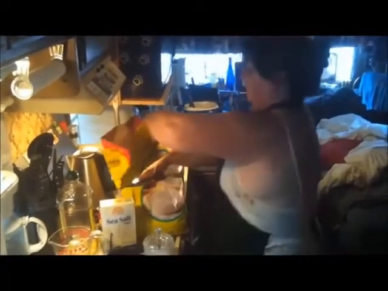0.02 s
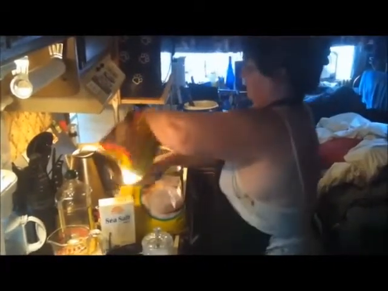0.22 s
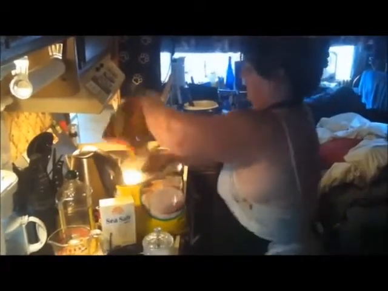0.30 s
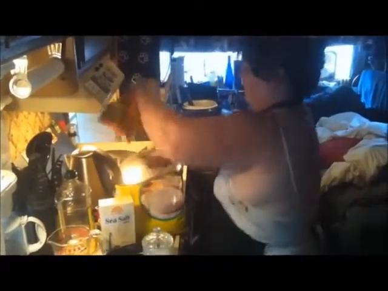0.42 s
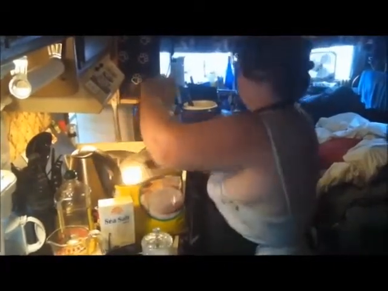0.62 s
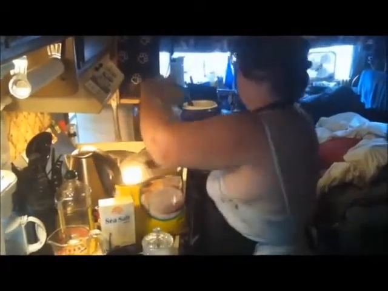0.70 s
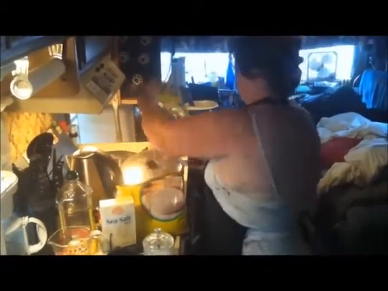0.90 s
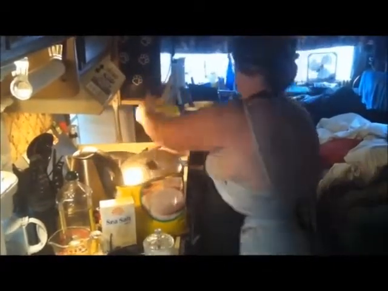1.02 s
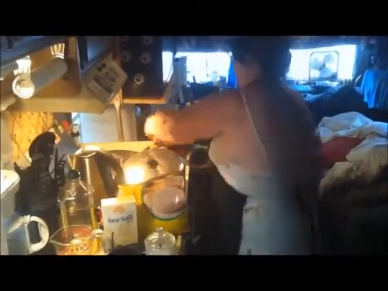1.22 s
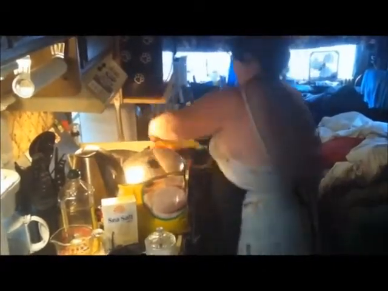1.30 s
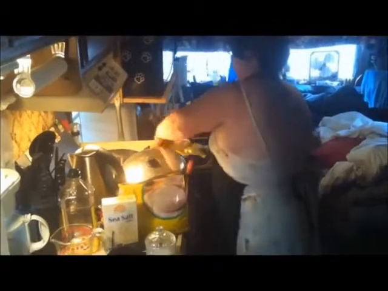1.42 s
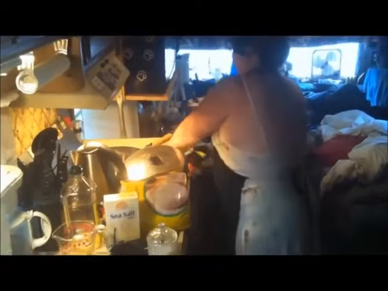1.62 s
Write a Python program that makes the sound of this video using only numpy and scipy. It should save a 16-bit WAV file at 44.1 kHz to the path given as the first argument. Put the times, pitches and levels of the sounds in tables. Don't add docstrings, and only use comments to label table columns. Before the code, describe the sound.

Stiff paper crackles softly, then a sharp clack with a short hollow cup ring and bright crease snap; a few fading crinkles, faint ticks over quiet hiss, then a light papery bump at the end. Cramped dry room, modest microphone.

```python
import sys
import numpy as np
from scipy import signal
from scipy.fft import rfft, irfft, next_fast_len
from scipy.io import wavfile
from scipy.ndimage import uniform_filter1d

SR = 44100
rng = np.random.default_rng(int(sys.argv[2]) if len(sys.argv) > 2 else 0)


def to_wav(sig):
    pcm = np.clip(np.atleast_2d(sig), -1, 1) * 32767
    pcm = np.round(pcm).astype(np.int16)
    wavfile.write(sys.argv[1], SR, pcm.T)


def convert_level_to_amplitude(level_db):
    exponent = np.asarray(level_db, float) / 20
    return 10 ** exponent


N = 72765

# (time [s], rustle level [dB])
HANDLING = [(0, -48.5), (.045, -50), (.12, -49), (.2, -50.5), (.243, -45.5), (.3, -44.5), (.36, -49.5),
            (.44, -57), (.49, -62.5), (.59, -62.5), (.66, -59), (.72, -67.5), (1.03, -64.5), (1.07, -61.5),
            (1.18, -71), (1.33, -63.5), (1.39, -62), (1.46, -57), (1.52, -60), (1.65, -55.5)]
# (time [s], peak [dB], brightness [dB], hold [s], t60 [s])
CRINKLES = [(0.064, -39, 0, 0.004, 0.058), (0.072, -35, 0.5, 0.0064, 0.15), (0.0748, -38, 7.5, 0.0035, .03),
            (0.134, -38, 2.5, 0.0075, 0.044), (0.146, -34, -1.5, 0.04, 0.27),
            (0.227, -33.5, 0, 0.0091, 0.067), (0.2466, -22.5, 0.5, 0.004, 0.12),
            (0.2515, -21.5, 6.5, 0.005, 0.07), (0.265, -22, 0, 0.013, 0.17), (0.308, -50, -5, 0.0037, 0.11),
            (0.37, -36, -4, .006, 0.092), (0.373, -34.5, 0.5, 0.01, 0.089),
            (0.385, -33.5, -9.5, 0.017, 0.081), (0.406, -45, 5, 0.022, 0.17),
            (0.491, -52, -25, 0.0083, 0.75), (0.611, -51, 2, 0.014, 0.24), (0.646, -60.5, 10, 0.017, 0.13),
            (0.808, -43.5, -2.5, 0.016, 0.11), (1.363, -64.5, 10.5, 0.12, .3),
            (1.575, -50, -18, 0.005, 0.05), (1.5847, -31.5, -9.5, 0.01, 0.07),
            (1.593, -33, -8, 0.0048, 0.11), (1.614, -41.5, -5, 0.0099, 0.2)]
# (frequency [Hz], density [dB per Hz])
RUSTLE = [(88, -43), (150, -17), (346, 1), (530, -8), (1270, 1), (4080, -4), (7450, -11), (12600, -9.5),
          (15600, -15)]
# (frequency [Hz], density [dB per Hz])
PAPER_BODY = [(71, -16), (120, -31), (263, 1.5), (424, -13.5), (555, 4), (849, 2.5), (1170, 6), (2600, 2.5),
              (3380, -23), (5720, -120)]
# (frequency [Hz], density [dB per Hz])
PAPER_EDGE = [(1410, -40), (2400, 2), (3630, 6.5), (3990, 5.5), (4600, 5), (7410, 1), (11700, -5.5),
              (13100, 0), (15600, -20)]
# (time [s], level [dB rms], pitch
# [Hz], t60 [s])
POPS = [(0.063, -40, 1385, 0.025), (0.062, -45.5, 1910, .02), (0.078, -46, 1090, 0.063),
        (.078, -45.5, 1515, 0.038), (.078, -45.5, 2230, 0.054), (.079, -49.5, 743, 0.022),
        (0.102, -46.5, 1034, .025), (0.137, -41.5, 1160, 0.023), (0.147, -44, 1580, 0.028),
        (.153, -50, 810, .02), (0.159, -38.5, 1090, 0.019), (0.168, -43, 1730, 0.027),
        (0.173, -43, 1170, 0.042), (.186, -50.5, 960, 0.062), (.252, -28.5, 1343, .03),
        (0.262, -31, 3940, 0.056), (0.276, -34, 1806, 0.036), (0.385, -41.5, 1720, 0.025),
        (.396, -47, 1180, .025), (.404, -54, 1240, 0.024), (0.416, -47.5, 1003, 0.027),
        (.494, -54, 1790, 0.043), (0.536, -61.5, 1440, .05), (.565, -61, 1080, 0.064),
        (0.612, -56.5, 1100, 0.074), (0.619, -48.5, 1780, 0.073), (0.653, -56.5, 1390, 0.06),
        (0.813, -50.5, 1768, 0.064), (0.829, -57, 1940, 0.037), (.975, -60.5, 1560, .025),
        (.994, -54, 600, .025), (1.034, -60, 295, 0.024), (1.052, -63.5, 1700, 0.033),
        (1.105, -66, 4690, 0.045), (1.256, -58.5, 1300, 0.021), (1.352, -65.5, 1600, 0.05),
        (1.408, -62.5, 350, 0.071), (1.436, -57.5, 328, 0.045), (1.455, -57, 2070, 0.033),
        (1.535, -56.5, 1120, 0.056), (1.588, -48.5, 355, 0.055), (1.585, -39.5, 1170, 0.014),
        (1.590, -39, 1124, 0.018), (1.588, -43.5, 1770, .02), (1.597, -40.5, 1516, 0.025),
        (1.601, -40.5, 2000, .015), (1.601, -42.5, 700, 0.016), (1.611, -42, 1223, 0.03),
        (1.62, -43, 1240, 0.015), (1.622, -48, 1950, .02)]
# (time [s], level [dB], upper
# over lower ring [dB], lower-ring pitch [ratio])
KNOCKS = [(0.2505, -24, -21, 1), (.2555, -21, -4, 1), (.2605, -22, -12, .97), (.2655, -29.5, -23, 1.137),
          (.269, -35, 19.5, 0.829), (.2785, -30.5, 14, 0.825), (.2845, -30.5, 13, 0.979),
          (.291, -41, 21.5, 1.42), (.299, -37, -2, 1.02), (0.306, -53, 10, 1.12), (.323, -38, -11, 1.155),
          (.331, -45, -14, 0.92), (.341, -39.5, 4, 0.97), (.3845, -41.5, 12.5, 1.1),
          (.390, -35.5, -2, 1.12), (.397, -44, -2, 0.92)]
# (frequency [Hz], level [dB], t60 [s])
CUP_LOW = [(588.7, -0.5, 0.038), (816, -18, 0.016), (470, -25, 0.019), (1346, -9, 0.02)]
# (frequency [Hz], level [dB], t60 [s])
CUP_HIGH = [(985, -9, .04), (1125, -19, .04), (3050, -28, .03)]
# (time [s], level [dB])
SNAPS = [
    (.0795, -42),
    (.2523, -17),
    (.2536, -23),
    (1.5862, -43),
    (1.5985, -46),
]
# (frequency [Hz], level [dB], t60 [s])
SNAP_RING = [(2265, -13.5, 0.02), (3405, -1, 0.026), (4050, -3.5, 0.0072), (5440, -17, 0.0047),
             (6350, -10, 0.02)]
# (time [s], level [dB], contact cut-off [Hz])
THUDS = [(.085, -49, 400), (0.227, -29.5, 150), (0.134, -39, 390), (0.253, -32.5, 400), (0.264, -32, 121),
         (0.279, -36.5, 294), (0.386, -54, 250), (0.622, -49, 194), (0.865, -56, 300), (0.885, -49, 216),
         (0.9736, -44, 870), (0.9857, -48.5, 940), (1.012, -57, 400), (1.222, -53.5, 530),
         (1.454, -55.5, 393), (1.586, -57, 900), (1.634, -39.5, 200), (1.645, -30.5, 170)]
# (frequency [Hz], level [dB], t60 [s])
COUNTER = [(33.2, -1, 0.032), (179, 0.5, 0.02), (226.3, -2, 0.063), (256, 1, 0.04), (357, -4.5, 0.13),
           (525, -3, 0.024), (646, -3, 0.029), (986, -3, 0.053), (1137, -2.5, 0.058), (1490, -5.5, 0.017)]
# (frequency [Hz], density [dB per Hz])
AIR = [(20, 8), (60, -11), (150, -6.5), (330, -10), (900, -12.5), (1700, -12.5), (2700, -15.5),
       (15700, -22.5)]
# (frequency [Hz], width [Hz], gain [dB])
HOUSING = [(2640, 950, -3.5), (4160, 740, 3), (6050, 790, 4.5), (7140, 2700, -4), (10190, 550, 5),
           (13200, 1200, 3.5), (16000, 630, -25)]

RUSTLE_DB, CRINKLE_DB, EDGE_DB, ATTACK_S = -1.5, -13, 1.5, .0015
GRAINS_PER_S, GRAIN_SPREAD_DB = 12000, 2
GRAIN_T60_S, GRAIN_SHORTENS = 0.026, 0.57
POP_SCUFF_S, LONGEST_T60_S = .004, .055
CUP_WOBBLE = .008
AIR_DB = -62.5
ROOM_T60_S, ROOM_DB, WALL_CUT_HZ = 0.18, -16, 3850
MIC_LOW_HZ, MIC_LEAK_DB, MIC_TOP_HZ = 124, -17.5, 15780


def rms_one(x):
    return x / np.sqrt(np.mean(x ** 2) + 1e-20)


def at_hz(points, hz):
    points_hz, points_db = np.transpose(points)
    return np.interp(np.log(hz), np.log(points_hz), points_db)


def drift(rate_hz):
    r = np.exp(-80 * np.pi * rate_hz / SR)
    noise = rng.standard_normal(N // 40 + 2002)
    slow = signal.lfilter([1], [1, -2 * r, r * r], noise)[2000:]
    return np.interp(np.arange(N) / 40, np.arange(len(slow)), rms_one(slow))


def ring(clicks, hz, t60_s):
    r = convert_level_to_amplitude(-60 / (max(t60_s, .002) * SR))
    w = 2 * np.pi * hz / SR
    return signal.lfilter([0, np.sin(w)], [1, -2 * r * np.cos(w), r * r], clicks + 1e-18)


def grains(spectrum, envelope, count):
    top_hz = min(spectrum[-1][0], MIC_TOP_HZ)
    pitches_hz = np.geomspace(spectrum[0][0], top_hz, count) * rng.uniform(.97, 1.0, count)
    sizes_db = GRAIN_SPREAD_DB * np.minimum(rng.exponential(1, N), 4)
    sizes = convert_level_to_amplitude(sizes_db) * rng.choice([-1, 1], N)
    out, power = 0, 0
    for hz in pitches_hz:
        chance = GRAINS_PER_S * np.sqrt(hz / 1000) / count / SR * 4
        clicks = (rng.random(N) < chance) * np.roll(sizes, rng.integers(N))
        t60_s = GRAIN_T60_S * (1000 / hz) ** GRAIN_SHORTENS
        gain = convert_level_to_amplitude(at_hz(spectrum, hz)) * np.sqrt(hz) * convert_level_to_amplitude(1.6 * drift(29))
        ring_rms = np.sqrt(chance * np.mean(sizes ** 2) * t60_s * SR / np.log(1e12))
        out = out + ring(clicks * envelope * gain, hz, t60_s) / ring_rms
        power += np.mean(gain ** 2)
    return out / np.sqrt(power)


def bag():
    t = np.arange(N) / SR
    body_power, edge_power = np.zeros(N), np.zeros(N)
    for start_s, peak_db, bright_db, hold_s, t60_s in CRINKLES:
        age_s = t - start_s
        rise = np.clip(age_s / ATTACK_S, 0, 1) ** 2
        shape = rise * convert_level_to_amplitude(-120 * np.maximum(age_s - hold_s, 0) / max(t60_s, .01))
        level_db = peak_db + CRINKLE_DB
        body_power += shape * convert_level_to_amplitude(2 * level_db)
        edge_power += shape * convert_level_to_amplitude(2 * (level_db + bright_db + EDGE_DB))
    times_s, levels_db = np.transpose(HANDLING)
    total = convert_level_to_amplitude(np.interp(t, times_s, levels_db) + RUSTLE_DB)
    moving = np.sqrt(np.maximum(total ** 2 - convert_level_to_amplitude(AIR_DB - 3.5) ** 2, 1e-12))
    rustle = grains(RUSTLE, moving, count=60)
    body = grains(PAPER_BODY, np.sqrt(body_power), count=34)
    edge = grains(PAPER_EDGE, np.sqrt(edge_power), count=56)
    return rustle + body + edge


def pops():
    out, count, span = np.zeros(N + SR), int(POP_SCUFF_S * SR), SR // 2
    scuffs = rng.standard_normal((60, 2000))
    for (start_s, db, hz, t60_s), noise in zip(POPS, scuffs):
        scuff = np.pad(noise[:count], (0, span - count))
        tone = ring(scuff, hz, min(t60_s, LONGEST_T60_S))
        start = int(start_s * SR)
        out[start:start + span] += convert_level_to_amplitude(db + 3) * tone / np.abs(tone).max()
    return out[:N]


def blow_spread_db(count):
    return rng.normal(0, 1.6, 60)[:count]


def cup_rings():
    times_s, low_db, upper_db, ratio = np.transpose(KNOCKS)
    at = (times_s * SR).astype(int)
    waver = np.interp(np.arange(N) / SR, times_s, ratio)
    out = np.zeros(N)
    for modes, knock_db, pitch in ((CUP_LOW, low_db, waver), (CUP_HIGH, low_db + upper_db, 1)):
        for hz, level_db, t60_s in modes:
            kicks = np.zeros(N)
            kicks[at] = convert_level_to_amplitude(2 * (knock_db + level_db + blow_spread_db(len(at))))
            keep = convert_level_to_amplitude(-120 / (min(t60_s, LONGEST_T60_S) * SR))
            energy = signal.lfilter([1], [1, -keep], kicks + 1e-18)
            pitch_hz = hz * pitch * (1 + CUP_WOBBLE * drift(40))
            swing = np.sin(2 * np.pi * np.cumsum(pitch_hz) / SR)
            out += uniform_filter1d(np.sqrt(energy), size=30, origin=14) * swing
    return out


def snaps():
    times_s, snap_db = np.transpose(SNAPS)
    at = (times_s * SR).astype(int)
    out = np.zeros(N)
    for hz, level_db, t60_s in SNAP_RING:
        clicks = np.zeros(N)
        clicks[at] = convert_level_to_amplitude(snap_db + level_db + blow_spread_db(len(at)))
        out += ring(clicks, hz, t60_s)
    return out


def counter():
    out = np.zeros(N)
    for start_s, db, cut_hz in THUDS:
        start = int(start_s * SR)
        click = np.zeros(N - start)
        click[0] = convert_level_to_amplitude(db)
        click = signal.sosfilt(signal.butter(2, cut_hz, fs=SR, output="sos"), click + 1e-18)
        for k, (hz, level_db, t60_s) in enumerate(COUNTER):
            gain = (-1) ** k * convert_level_to_amplitude(level_db + rng.normal(0, 1.0))
            out[start:] += gain * ring(click, hz, t60_s)
    return out


def room(x):
    size = next_fast_len(N + SR // 2)
    w = 2 * np.pi * np.fft.rfftfreq(size)
    dull = 1 / (1 + 1j * w * SR / (2 * np.pi * WALL_CUT_HZ))
    echo = 0
    for k, lag in enumerate(rng.uniform(.004, .022, 10) * SR):
        loop = convert_level_to_amplitude(-60 * lag / SR / ROOM_T60_S) * dull * np.exp(-1j * w * lag)
        echo = echo + (-1) ** k * loop / (1 - loop)
    return irfft(rfft(x, size) * echo, size)[:N]


def air():
    hz = np.maximum(np.fft.rfftfreq(N, 1 / SR), 10)
    noise = rfft(rng.standard_normal(N)) * convert_level_to_amplitude(at_hz(AIR, hz))
    band = np.round(3 * np.log2(np.maximum(hz, 100) / 100)).astype(int)
    together_db = 0.27 * drift(5.9)
    out = np.zeros(N)
    for k in range(band.max() + 1):
        out += irfft(noise * (band == k), N) * convert_level_to_amplitude(together_db + 1.0 * drift(9))
    return convert_level_to_amplitude(AIR_DB) * rms_one(out)


def scene():
    blows = cup_rings() + snaps() + counter() + pops()
    mix = bag() + blows + convert_level_to_amplitude(ROOM_DB) * room(blows) + air()
    return mix[None]


def housing(x, hz, width_hz, db):
    w = 2 * np.pi * hz / SR
    damp, lift = np.sin(w) * width_hz / hz / 2, convert_level_to_amplitude(db / 2)
    b = [1 + damp * lift, -2 * np.cos(w), 1 - damp * lift]
    a = [1 + damp / lift, -2 * np.cos(w), 1 - damp / lift]
    return signal.lfilter(b, a, x)


def band_limit(x):
    return signal.sosfilt(signal.butter(12, 15750, fs=SR, output="sos"), x)


def record(dry):
    low_cut = signal.butter(4, MIC_LOW_HZ, "high", fs=SR, output="sos")
    heard = signal.sosfilt(low_cut, dry) + convert_level_to_amplitude(MIC_LEAK_DB) * dry
    for hz, width_hz, db in HOUSING:
        heard = housing(heard, hz, width_hz, db)
    top_cut = signal.ellip(12, .5, 60, MIC_TOP_HZ, fs=SR, output="sos")
    heard = signal.sosfilt(top_cut, heard)
    return band_limit(heard)


dry = scene()
out = record(dry)
to_wav(out)
```